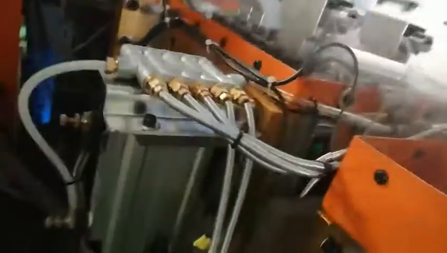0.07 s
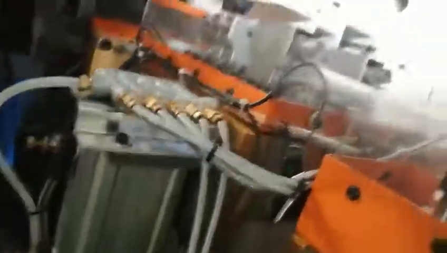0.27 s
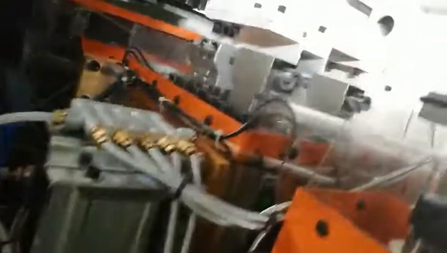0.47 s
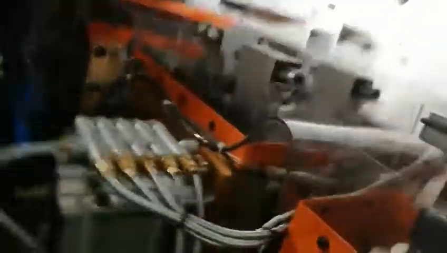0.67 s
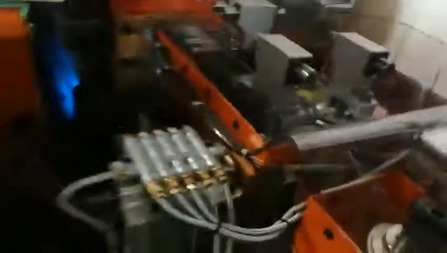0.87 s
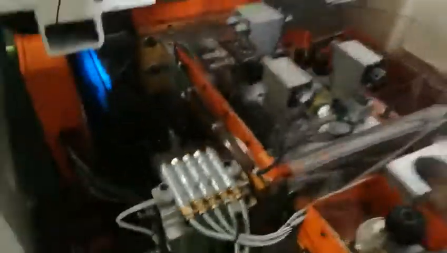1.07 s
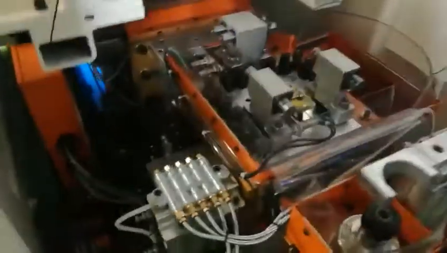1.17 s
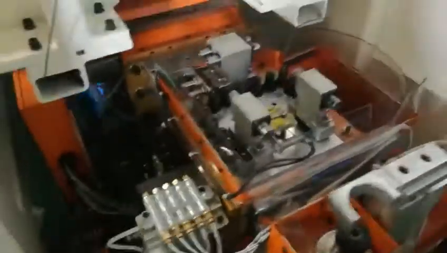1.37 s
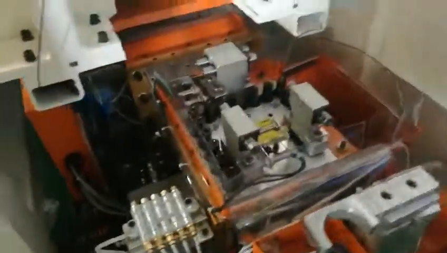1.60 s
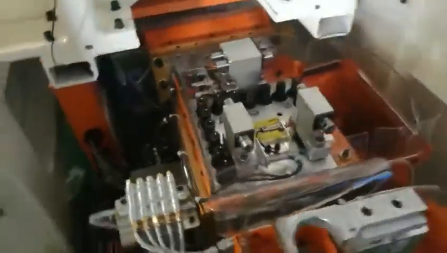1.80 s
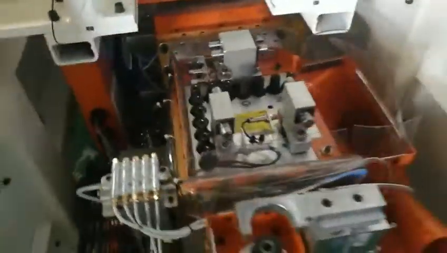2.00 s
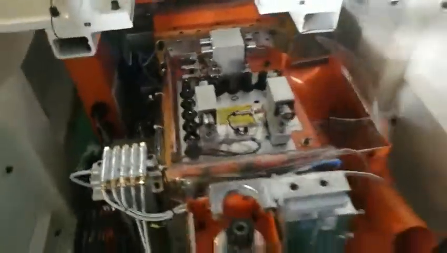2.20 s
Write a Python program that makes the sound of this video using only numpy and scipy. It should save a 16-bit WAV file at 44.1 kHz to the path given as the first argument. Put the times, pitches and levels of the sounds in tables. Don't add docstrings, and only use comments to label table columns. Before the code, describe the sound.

Hard steel clacks from a drilling machine, twice in quick succession, above a workshop's humming fans

```python
import sys
import numpy as np
from scipy import signal
from scipy.fft import rfft, irfft
from scipy.io import wavfile
from scipy.ndimage import uniform_filter1d

SR = 44100
rng = np.random.default_rng(int(sys.argv[2]) if len(sys.argv) > 2 else 0)


def unload_audio(sound):
    columns = np.transpose(np.atleast_2d(sound))
    steps = np.round(np.clip(columns, -1, 1) * 32767)
    wavfile.write(sys.argv[1], SR, steps.astype(np.int16))


def boost(x):
    u = np.asarray(x, float) / 20
    return 10 ** u


N = 99225
RISE_S = .0013


def evened(x):
    return x / np.sqrt(np.mean(x ** 2) + 1e-20)


def read(points, hz):
    f, value = np.transpose(points)
    return np.interp(np.log(hz + 1), np.log(f + 1), value)


def along(table, column):
    rows = np.array(table)
    return np.interp(np.arange(N) / SR, rows[:, 0], rows[:, column])


def add(mix, s, sound):
    part = mix[..., round(s * SR):][..., :sound.shape[-1]]
    part += sound[..., :part.shape[-1]]


def coloured(x, points):
    return irfft(rfft(x) * boost(read(points, np.fft.rfftfreq(N, 1 / SR))), N)


def ring(hz, t60, size=9000):
    t = np.arange(size) / SR
    return boost(-60 * t / t60) * np.sin(2 * np.pi * hz * t)


# pitch in Hz, left over right in dB.
HUM_LR = [(60, 0.5), (130, 0.98), (290, 1.5), (640, 7.3), (1410, 11.5), (3100, 11.4), (6820, 29),
          (15000, 51)]
CLACK_LR = [(60, 2), (130, 9), (290, -3), (640, 8.5), (1410, 6.5), (3100, 5.5), (6820, 19), (15000, 39)]
# pitch in Hz, likeness from 0 to 1.
HUM_SAME = [(350, .99), (700, .8), (1500, .6), (3000, .45), (8000, .6)]
CLACK_SAME = [(400, .99), (650, .7), (900, .45), (3000, .4), (8000, .5)]


def ports(pair, balance, same):
    lag_s, cup_rad, cup_hz = .000535, 1.1, 650
    hz = np.fft.rfftfreq(N, 1 / SR)
    left, own = rfft(pair)
    alike = np.clip(read(same, hz), 0, 1)
    cup_turn = cup_rad * hz ** 2 / (hz ** 2 + cup_hz ** 2)
    late = np.exp(-1j * (2 * np.pi * hz * lag_s + cup_turn))
    right_gain = boost(-read(balance, hz))
    right = right_gain * (alike * late * left + np.sqrt(1 - alike ** 2) * own)
    return irfft(np.array([left, right]) * 2 / np.sqrt(1 + right_gain ** 2), N)


# pitch in Hz, level in dB per Hz.
ROAR = [(22, -9), (85, -9), (200, -6), (480, -11.5), (2050, -9.5), (3480, -12), (8270, -24), (15700, -40)]
# pitch in Hz, width in Hz, level in dB.
DUCT = [(49.6, 10, -57.5), (780, 530, -56), (2651, 960, -48), (2968, 230, -51), (3193, 150, -56.5),
        (8100, 330, -70)]
# time in seconds, added level in dB.
NEAR = [(0, 8.5), (.1, 8.5), (.22, 8.5), (.5, 3), (.7, 2.5), (1., 2), (1.5, 1), (1.902, 2), (2.25, 1.5)]
# pitch in Hz, share of the nearness (1 is all of it).
NEAR_SHARE = [(60, 0.79), (300, 1.04), (900, 1.56), (3000, 0.62), (9000, 1.03)]


def roar():
    roar_db, patch_db = -47.5, 1.31
    frames, hz = N // 256 + 5, np.fft.rfftfreq(1024, 1 / SR)
    a, b, c, d, patches = rng.standard_normal((frames, 513, 5)).T
    patches = evened(uniform_filter1d(uniform_filter1d(patches, 12, 0), 8, 1))
    bed = boost(read(ROAR, hz)) ** 2
    power = boost(roar_db) ** 2 * bed / bed.sum()
    for f, width, db in DUCT:
        hump = 1 / (1 + (2 * (hz - f) / width) ** 2) ** 3
        power = power + boost(db) ** 2 * hump / hump.sum()
    near_db = np.interp(np.arange(frames) * 256 / SR, *np.transpose(NEAR))
    near_db = near_db * read(NEAR_SHARE, hz)[:, None]
    noise = np.array([a + 1j * b, c + 1j * d])
    z = noise * np.sqrt(power)[:, None] * boost(near_db + patch_db * patches)
    return signal.istft(z, nperseg=1024, noverlap=768)[1][:, :N]


# time in seconds, tone in dB, octave at the left in dB, octave at the right in dB.
WHINE = [(0, -41.5, -47, -57), (.22, -43, -45, -54), (.6, -49.5, -55, -64), (.73, -56, -52, -73),
         (.87, -58, -60, -76), (.95, -54.5, -48, -58), (1.23, -68, -46, -68), (1.31, -70, -49, -73),
         (1.36, -61, -46.5, -72), (1.47, -63, -63, -79), (1.53, -59, -62, -63), (1.6, -60, -49.5, -58),
         (1.76, -56.5, -61, -54.5), (1.83, -57.5, -52.5, -59), (1.95, -53, -47.5, -65),
         (2.03, -53, -47.5, -67), (2.11, -54.5, -51, -65), (2.25, -56, -54, -58)]
# multiple of the motor pitch, level in dB.
OVERTONES = [(1.7, -16.), (4, -5.), (6.348, -12.), (9.81, -21.), (9.979, -19.), (10.06, -18.),
             (10.237, -16.)]


def whine():
    whine_hz, wander_hz = 798.2, 1.373
    sides = boost(np.array([[0], [-8.0]]))
    wander = evened(uniform_filter1d(rng.standard_normal(N), 4000))
    turn = 2 * np.pi * np.cumsum(whine_hz + wander_hz * wander) / SR
    tone = boost(along(WHINE, column=1)) * np.sin(turn)
    octave_db = np.array([along(WHINE, column=2), along(WHINE, column=3)])
    octave = boost(octave_db + wander) * np.sin(2 * turn)
    rest = np.zeros(N)
    for i, (multiple, db) in enumerate(OVERTONES):
        waver_db = 5.8 * np.roll(wander, 9000 * i)
        rest += boost(db - 62.5 + waver_db) * np.sin(multiple * turn)
    return (tone + rest) * sides + octave


# time in seconds, added level in dB.
THROB = [(.9, -15), (1.19, -15), (1.23, 2.5), (1.43, 2.5), (1.49, -14), (1.6, 0.5), (1.82, 0), (1.88, -1),
         (2.02, -3), (2.11, 2.5), (2.17, -3), (2.25, 6.5)]


def blower():
    blower_db, middle_s, hz_there, hz_per_s = -61, 1.2, 142, 11
    t = np.arange(N) / SR - middle_s
    turn = 2 * np.pi * np.cumsum(hz_there + hz_per_s * t) / SR
    return boost(blower_db + along(THROB, column=1)) * np.sin(turn)


def rattle(decay_s):
    t = np.arange(1800) / SR
    grit = rng.standard_normal((2, 1800))
    grit = grit * boost(1.5 * rng.exponential(1, 1800))
    return grit / np.sqrt(np.mean(grit ** 2)) * np.minimum(t / RISE_S, 1) * np.exp(-t / decay_s)


# start in seconds, level in dB.
TICKS = [(0.087, -35), (0.112, -32), (0.1514, -53), (0.568, -39), (0.5934, -46), (0.6074, -31),
         (0.611, -31), (0.62, -41), (0.6338, -33), (0.6432, -35)]


def ticks():
    out = np.zeros((2, N))
    for s, db in TICKS:
        add(out, s, boost(db - 1.0) * rattle(decay_s=.0038))
    return out


# start in seconds, pitch in Hz, level in dB.
PINGS = [(.143, 15100, -55), (.145, 10600, -53), (.210, 10900, -59), (.2315, 3870, -40), (.243, 3750, -34),
         (.244, 9410, -40), (.245, 10500, -48), (.248, 12800, -31), (.249, 8100, -32), (.250, 15110, -35),
         (.261, 5905, -35), (.2715, 13340, -32), (.292, 3820, -42), (.303, 5190, -44), (.304, 8800, -44),
         (.361, 10700, -58), (.3765, 3350, -30), (.389, 9360, -41), (.390, 3480, -38.5), (.401, 285, -20),
         (.405, 147.4, -41), (.435, 150, -37), (.404, 5100, -34), (.405, 5795, -28), (.405, 8730, -26),
         (.406, 11900, -26), (.411, 8260, -27), (.414, 10720, -27.5), (.415, 10100, -26),
         (.415, 12800, -29), (.420, 13370, -31), (.423, 15000, -33), (.439, 4990, -37), (.439, 3770, -43),
         (.440, 6040, -38), (.441, 12400, -43), (.452, 12300, -36), (.454, 13200, -38), (.466, 10200, -41),
         (.469, 8860, -36), (.471, 7900, -38), (.471, 8200, -34), (.473, 10300, -35), (.473, 13000, -36),
         (.487, 8900, -40), (.495, 10090, -49), (.570, 3850, -47), (.612, 13600, -41.5), (.646, 13400, -55)]


def pings():
    ping_t60, buzz_depth, choke_s = .1, .4, .026
    out, t = np.zeros((2, N)), np.arange(5000) / SR
    shape = np.minimum(t / RISE_S, 1) * np.exp(-(t / choke_s) ** 4)
    for s, hz, db in PINGS:
        waver = uniform_filter1d(uniform_filter1d(rng.standard_normal((2, 5000)), 90), 90)
        buzz = 1 + buzz_depth * evened(waver) * (hz > 1000)
        add(out, s, boost(db) * buzz * ring(hz, ping_t60, size=5000) * shape)
    return out


# time in seconds, level in dB.
CHATTER = [(.228, -65), (.241, -30), (.252, -24), (.28, -31.5), (.297, -27.5), (.31, -27.5), (.342, -49),
           (.349, -26.5), (.372, -44), (.378, -34), (.394, -36), (.405, -18), (.413, -17), (.432, -29.5),
           (.443, -18.5), (.452, -35), (.50, -37), (.54, -77)]


def chatter():
    clumps_db = 2.5 * evened(uniform_filter1d(rng.standard_normal(N), 150))
    moving = np.arange(N) < .6 * SR
    return boost(along(CHATTER, column=1) + clumps_db) * rng.standard_normal((2, N)) * moving


FRAME_HZ = [436.6, 561, 650, 731, 817.5, 935, 998, 1239, 1383, 1516, 1671, 1858, 2110, 2840]


def frame_ring(blow, hz):
    t60_at_1khz, damping, reach_octaves = .07, .4, .6
    body = np.zeros(5000)
    for f in FRAME_HZ * rng.uniform(.97, 1.03, len(FRAME_HZ)):
        strength_db = -6 * (np.log2(f / hz) / reach_octaves) ** 2
        body += boost(strength_db) * ring(f, t60_at_1khz * (f / 1000) ** -damping, size=5000)
    rung = signal.fftconvolve(blow, body[None], axes=1)
    return rung / np.sqrt(np.mean(rung[:, :900] ** 2, 1, keepdims=True))


STEEL_HZ = [3820, 4400, 4900, 5740, 5990, 7180, 8000, 8770, 9450, 10100, 10720, 12740, 13370, 15120]


def steel_slide(crack):
    steel = sum(ring(f, t60=.054, size=3000) for f in STEEL_HZ)
    return signal.oaconvolve(crack, steel[None] / np.linalg.norm(steel), axes=1)[:, :N]


# start in seconds, crack in dB, frame in dB, frame pitch in Hz.
CLACKS = [(0.2343, -27, -29, 1420), (.241, -16, -28, 1580), (.247, -15.5, -37, 940),
          (.258, -36, -26.5, 780), (.271, -52, -36.5, 650), (.287, -55, -28.5, 740),
          (.295, -35, -24.5, 1000), (.307, -56, -27.5, 480), (.317, -52, -34.5, 426), (.346, -49, -39, 940),
          (.359, -61, -32.5, 1090), (.376, -26.5, -37, 780), (.388, -51, -30.5, 890), (.400, -20, -63, 830),
          (0.407, -12.5, -27, 1320), (.416, -16.5, -24.5, 1580), (.436, -37, -28.5, 870),
          (.441, -21, -31.5, 1040), (.468, -27, -42, 910), (.484, -45, -39, 830), (.496, -31, -37, 540),
          (.536, -51, -52, 810)]
# pitch in Hz, level in dB per Hz.
CRACK = [(300, -28), (600, -12), (1700, -17), (3200, -14.5), (5500, -21.5), (10400, -20), (15700, -26)]


def clacks():
    crack, frame = np.zeros((2, N)), np.zeros((2, N))
    for s, crack_db, frame_db, hz in CLACKS:
        blow = rattle(decay_s=.006)
        add(crack, s, boost(crack_db + 0.5) * blow)
        add(frame, s, boost(frame_db - 4.5) * frame_ring(blow, hz))
    crack = crack + ticks() + chatter()
    crack = boost(10.0) * coloured(crack, CRACK)
    frame = coloured(frame, [(150, -26), (400, 0)])
    return boost(-0.5) * crack + boost(-9.5) * steel_slide(crack) + frame


def slam():
    slam_s, slam_db, slam_hz = .4082, -13, 1300
    u = 2 * np.pi * slam_hz * (np.arange(N) / SR - slam_s)
    return boost(slam_db) * (1 - u ** 2) * np.exp(-u ** 2 / 2) * np.ones((2, 1))


# pitch in Hz, time to fall 60 dB in seconds.
SHOP = [(250, 0.29), (700, 0.78), (2000, 0.44), (6000, 0.4), (15000, 0.4)]


def shop(x):
    taps = np.zeros((2, SR))
    at = np.arange(300, SR - 20, 20) + rng.integers(0, 20, (2, (SR - 301) // 20))
    np.put_along_axis(taps, at, rng.choice([-1., 1.], at.shape), 1)
    hz, t, z = signal.stft(taps, SR, nperseg=256)
    fading = boost(-60 * t / read(SHOP, hz)[:, None])
    tail = signal.istft(z * fading, SR, nperseg=256)[1]
    return signal.fftconvolve(x[:1], tail / np.linalg.norm(tail[0]), axes=1)[:, :N]


# start in seconds, level in dB, pitch in Hz.
FINGER = [(1.392, -39, 1400), (1.697, -39, 800), (1.769, -40, 1100), (1.818, -36, 1100), (1.575, -46, 900)]


def finger():
    out = np.zeros((2, N))
    sides = np.array([[.1], [1]])
    for s, db, hz in FINGER:
        add(out, s, boost(db) * ring(hz, t60=.005, size=400) * sides)
    return out


# pitch in Hz, level in dB.
PUFF = [(500, -29), (1500, 10), (4000, -3), (9000, -4.5), (15000, -19)]


def puff():
    puff_s, rise_s, fall_s, puff_db = 1.885, .06, .045, -52.5
    t = np.arange(N) / SR - puff_s
    shape = np.exp(-(t / np.where(t < 0, rise_s, fall_s)) ** 2)
    return boost(puff_db) * shape * evened(coloured(rng.standard_normal((2, N)), PUFF))


def scene():
    blows = clacks() + slam()
    rings = boost(-3.5) * pings()
    echo = boost(-10.5) * shop(blows + boost(-10) * rings)
    hits = blows + rings + echo
    hum = boost(-5.5) * roar() + puff()
    heard = ports(hits, CLACK_LR, CLACK_SAME) + ports(hum, HUM_LR, HUM_SAME)
    return heard + whine() + finger() + blower()


def top_cut(x):
    return signal.sosfilt(signal.butter(12, 15850, fs=SR, output="sos"), x)


def record(dry):
    edge_hz = 15800
    lowpass = signal.firwin(401, edge_hz, window=("kaiser", 9), fs=SR)
    limited = signal.oaconvolve(dry, lowpass[None], "same")
    return top_cut(limited)


dry = scene()
out = record(dry)
unload_audio(out)
```